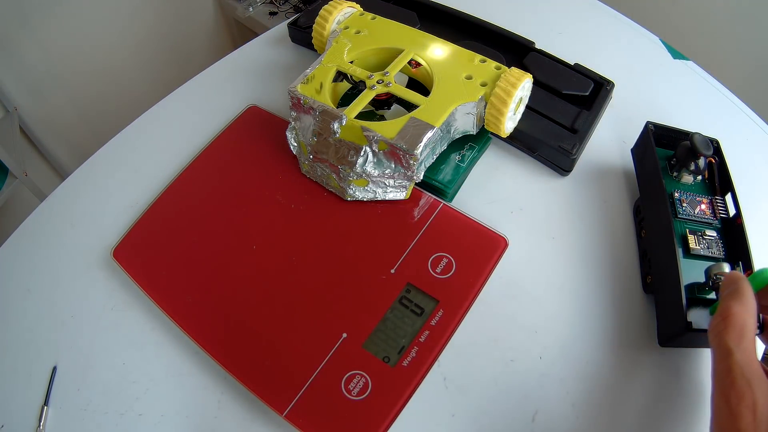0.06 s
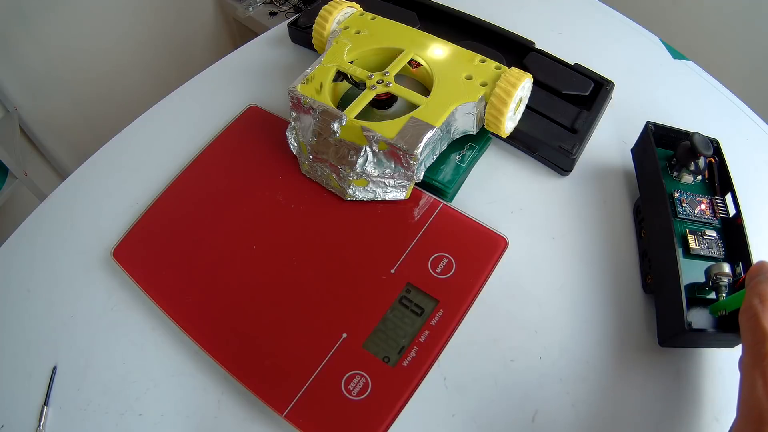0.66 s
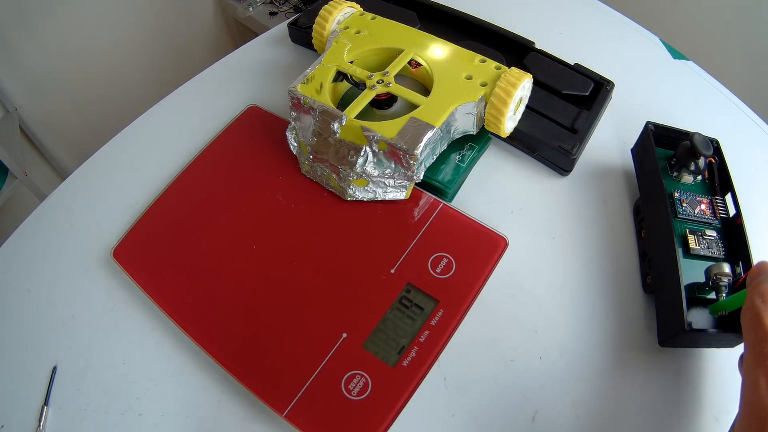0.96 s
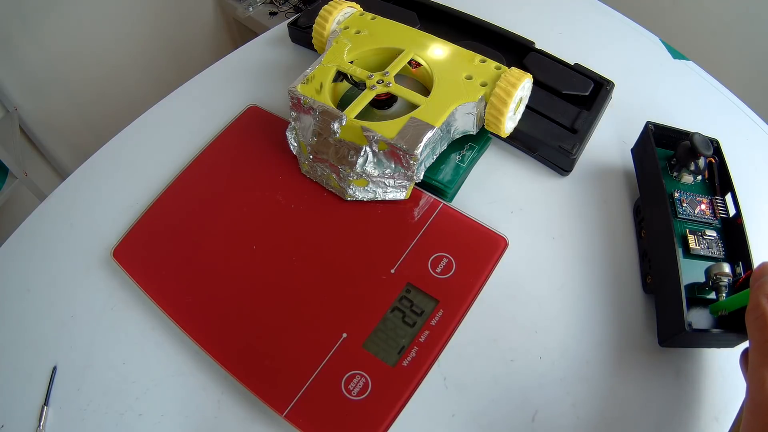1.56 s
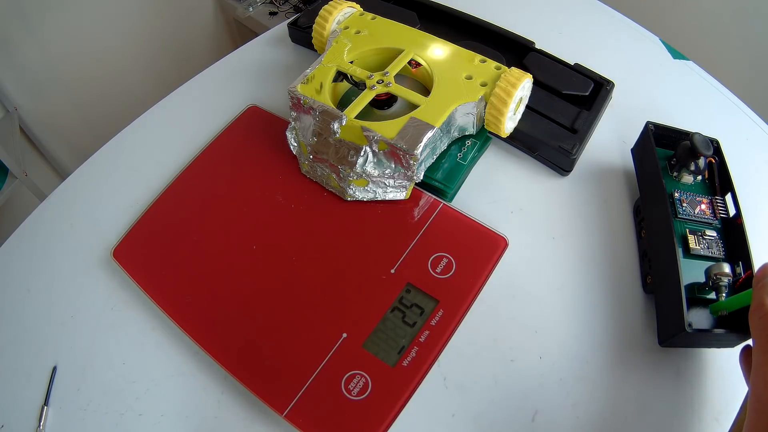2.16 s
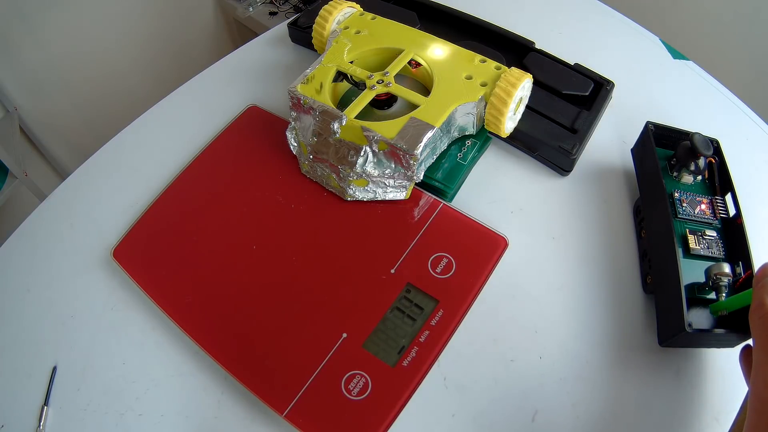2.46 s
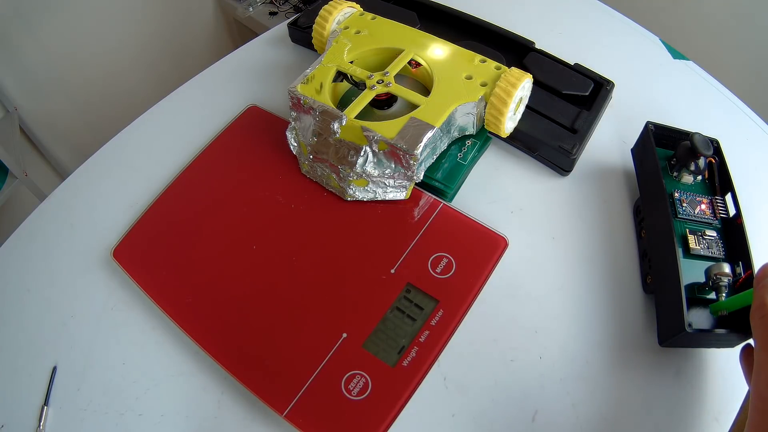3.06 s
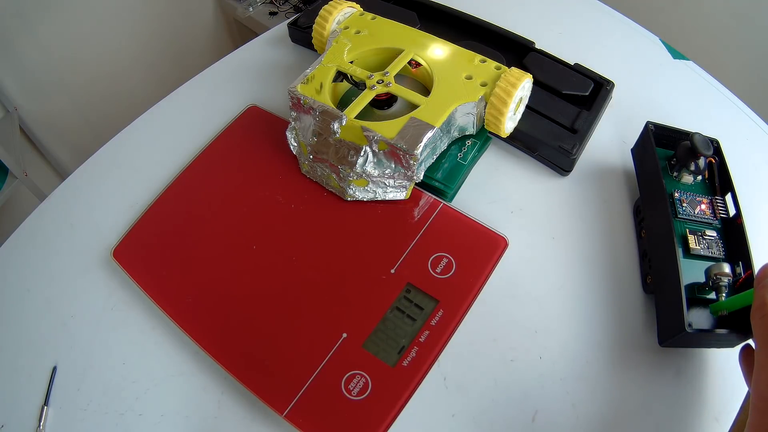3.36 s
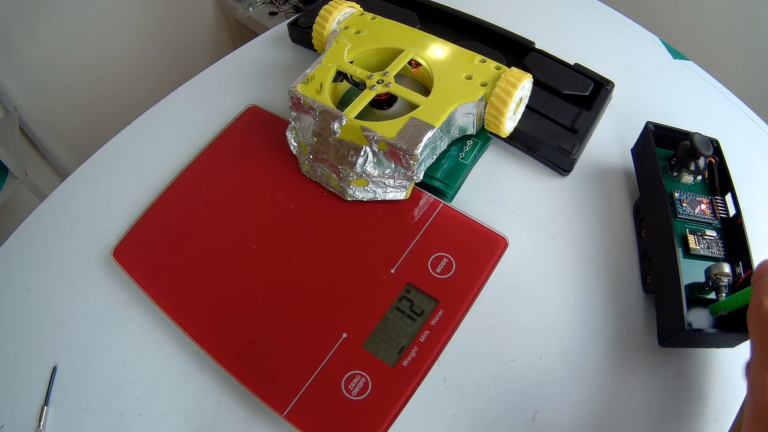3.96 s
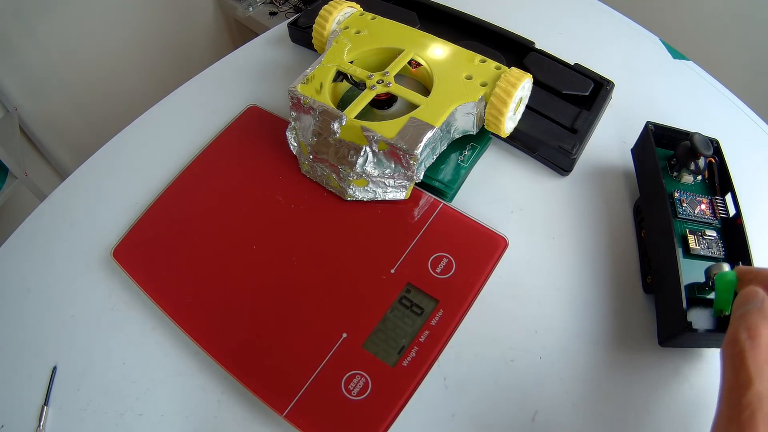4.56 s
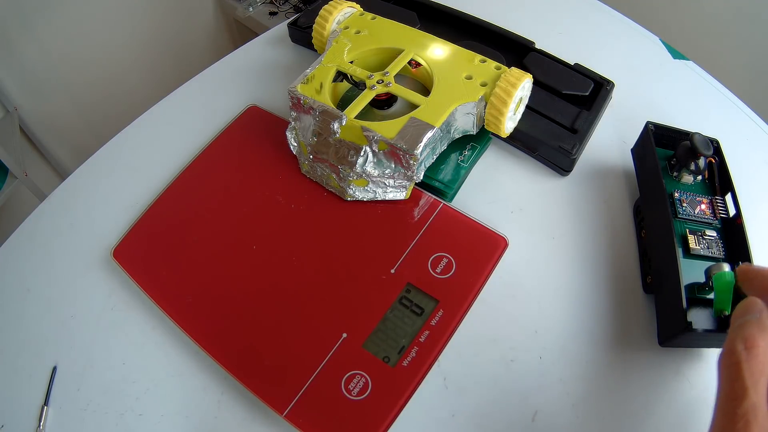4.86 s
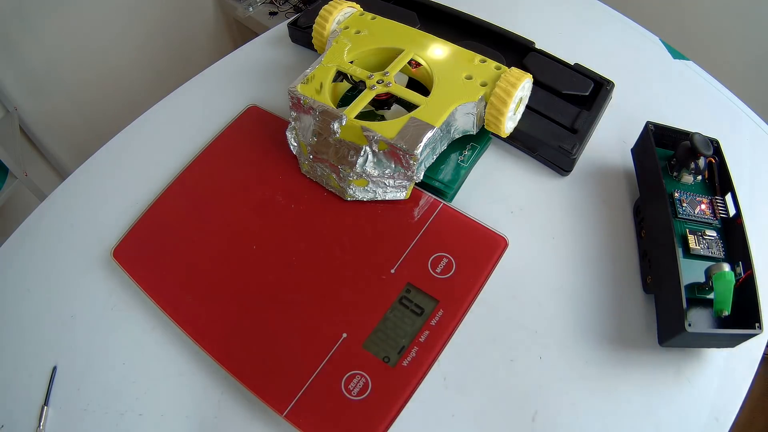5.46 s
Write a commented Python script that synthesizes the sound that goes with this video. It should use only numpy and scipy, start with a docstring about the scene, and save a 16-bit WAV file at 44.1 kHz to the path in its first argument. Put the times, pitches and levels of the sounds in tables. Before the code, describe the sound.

For the first half second there is only the faint, low background noise of a quiet room. At about 0.6 seconds a small electric fan in a plastic robot chassis starts with a brief, rough, high squeal. It spins up quickly, its whine rising over a turbulent rush of air by 1 second. The pitch and loudness keep climbing in small steps, with a slight buzz and thin hiss joining at around 2 seconds. The fan holds nearly steady, then rises a little more to its peak at about 3.6 seconds. From 3.8 seconds the whine falls and the air fades, exposing a dry bearing rasp, a light plastic rattle and a brief thin whistle near 4.5 seconds. The fan stops at about 5 seconds, leaving quiet room noise. The sound is mono, with light room reverberation.

```python
"""A small three-bladed electric fan in a plastic robot chassis, on a table in a quiet room, in mono.
Its drive squeals as it starts. The blades chop the air into a rising whine over a turbulent rush,
while motor tones, all multiples of the shaft speed, sweep through the shell's fixed resonances.
The speed holds, rises a little more, then decays under drag and friction with a dry rasp of bearings."""
import sys
import numpy as np
from scipy import signal
from scipy.fft import rfft, irfft, next_fast_len
from scipy.io import wavfile
from scipy.ndimage import uniform_filter1d, map_coordinates

SR = 44100
rng = np.random.default_rng(int(sys.argv[2]) if len(sys.argv) > 2 else 0)


def transcribe(signal):
    """Save signal, clipped to [-1, 1], as a 16-bit WAV file at the path in sys.argv[1]."""
    frames = np.atleast_2d(signal).T
    limited = np.clip(frames, -1, 1)
    pcm = np.round(limited * 32767).astype(np.int16)
    wavfile.write(sys.argv[1], SR, pcm)


N = 243299
TIME = np.arange(N) / SR
BLADE_COUNT = 3


def gain_of(db):
    """Decibels to amplitude ratio."""
    return 10 ** (np.asarray(db) / 20)


def unit_rms(x):
    """Normalisation to an rms of 1."""
    return x / np.sqrt(np.mean(x ** 2) + 1e-20)


def curve_at(points, hz):
    """Linear interpolation on a log-frequency axis."""
    f, value = np.transpose(points)
    return np.interp(np.log(hz + 1), np.log(f + 1), value)


def noise(spectrum):
    """Spectral shaping of white noise, at an rms of 1."""
    size = next_fast_len(N)
    shape = gain_of(curve_at(spectrum, np.fft.rfftfreq(size, 1 / SR)))
    return unit_rms(irfft(rfft(rng.standard_normal(size)) * shape, size)[:N])


def wander(rate_hz):
    """Smooth random modulation of rms 1: a spline through random knots."""
    knots = rng.standard_normal(4096)
    return unit_rms(map_coordinates(knots, [TIME[::16] * rate_hz], order=3, mode="wrap").repeat(16)[:N])


def resonate(x, hz, width_hz, stages=1):
    """Second-order resonance with a peak gain of 1; cascading steepens its skirts."""
    for _ in range(stages):
        x = signal.lfilter(*signal.iirpeak(hz, hz / width_hz, fs=SR), x)
    return x


def filtered(x, order, hz, kind):
    """Butterworth filtering."""
    return signal.sosfilt(signal.butter(order, hz, kind, fs=SR, output="sos"), x)


def tone(turns, multiple, flutter_db, jitter):
    """A rotational order with random amplitude and phase modulation (jitter in radians)."""
    amplitude = np.sqrt(2) * gain_of(flutter_db * wander(45))
    return amplitude * np.sin(2 * np.pi * multiple * turns + jitter * wander(70))


def power_law(pace, power, knee):
    """A gain rising as a power of the pace (share of top speed), saturating at 1 above the knee."""
    rise = (pace / knee) ** power
    return rise / np.sqrt(1 + rise ** 2)


def run_down(from_s=4.343, over_s=0.24):
    """A linear ramp from 0 to 1 into the closing timbre, by default during the coast."""
    return np.clip((TIME - from_s) / over_s, 0, 1)


def room_tone():
    """Stationary background noise, strongest in the bass."""
    # noise spectrum: (frequency [Hz], relative level [dB])
    spectrum = [(15, -27), (25, -1), (53, -2.5), (110, -2.5), (148, -1), (215, -1.5), (741, -10.5),
                (826, -10), (1410, -18), (4380, -30.5), (10900, -32.5), (14300, -38.5), (15500, -34)]
    return gain_of(-59) * noise(spectrum)


def drive_squeal(onset_s=0.538, peak_s=0.631, swell_db_per_s=150, fade_db_per_s=293):
    """Two close, noise-driven resonances beat in a rough squeal that swells until the rotor picks up."""
    # excitation spectrum: (frequency [Hz], relative level [dB])
    spectrum = [(500, -29), (2200, -35), (3200, -18), (4400, -36.5), (7300, -25), (8300, -12), (9300, -25),
                (15000, -52)]
    pair = resonate(noise(spectrum), 8110, 55) + resonate(noise(spectrum), 8330, 59.9)
    late = TIME - peak_s
    swell = (TIME > onset_s) * gain_of(-35 + np.minimum(swell_db_per_s * late, -fade_db_per_s * late))
    return swell * (gain_of(2.5) * unit_rms(pair) + gain_of(-1.5) * noise(spectrum))


def chassis_pings(hz=770, t60=0.2, attack_s=0.0092):
    """Damped free vibration of one chassis mode as the rotor starts and settles."""
    # excitations of the mode: (time [s], level [dB])
    pings = [(0.575, -48), (4.645, -42), (5.012, -46)]
    ages = [(np.maximum(TIME - s, 0), db) for s, db in pings]
    return sum(gain_of(db - 60 * t / t60) * (1 - np.exp(-t / attack_s)) * np.sin(2 * np.pi * hz * t)
               for t, db in ages)


def shaft_speed(start_s=0.595, stop_s=5.02, drag_per_s=1.15):
    """Turns per second: under power, then slowed along a tangent law by air drag and dry friction."""
    # the fan under power: (time [s], shaft speed [turns/s])
    throttle = [(0.66, 121.7), (0.72, 171.8), (0.82, 209.1), (0.93, 229.6), (1.18, 237.6), (1.33, 255.4),
                (1.53, 269.8), (1.84, 278.5), (2.0, 289.5), (2.25, 293.8), (2.38, 299.7), (2.82, 299.5),
                (2.97, 306.9), (3.2, 309.0), (3.53, 334.6), (3.73, 337.2), (3.9, 314.6), (3.98, 286.1),
                (4.09, 228.8)]
    times, speeds = np.transpose([(start_s, 0)] + list(throttle))
    remaining_s = stop_s - np.clip(TIME, times[-1], stop_s)
    coast = np.tan(drag_per_s * remaining_s) / np.tan(drag_per_s * (stop_s - times[-1]))
    return abs(uniform_filter1d(np.interp(TIME, times, speeds) * coast, size=1500))


def shell(x):
    """Forced vibration: the plastic shell resonates at fixed frequencies, whatever drives it."""
    # shell modes: (frequency [Hz], bandwidth [Hz], gain [dB])
    modes = [(1450, 110, 0), (2850, 200, -14), (3860, 90, -10), (4280, 90, -6), (4550, 85, 2.5),
             (5150, 160, -16), (6360, 250, -19), (8250, 300, -24), (11500, 120, -28)]
    return sum(gain_of(db) * resonate(x, hz, width) for hz, width, db in modes)


def bearing_rasp(turns, pace):
    """Brush and bearing friction throbs once a turn, dulls at low speed and rattles the shell."""
    # friction and knock spectra: (frequency [Hz], relative level [dB])
    rasp_spectrum = [(300, -33), (1200, 0.5), (2600, -15), (3450, -18), (4300, -1.5), (5100, -1),
                     (5700, 1.5), (6600, -2), (7400, -11.5), (8400, -8), (10000, -13.5), (11800, -22.5),
                     (13500, -22), (15500, -32)]
    knock_spectrum = [(500, -12.5), (1400, 0.5), (2300, -7), (3400, -8), (4500, 2.5), (5300, -14),
                      (12000, -11)]
    grain = gain_of(wander(700) + 1.1 * wander(80)) * (1 + 0.13 * np.cos(2 * np.pi * turns))
    scrape = noise(rasp_spectrum) * grain
    dull = filtered(noise(rasp_spectrum) * grain, 3, 6800, "lowpass")
    hiss = pace * scrape + np.sqrt(1 - pace ** 2) * dull
    knocks = noise(knock_spectrum) * grain
    ring = unit_rms(shell(knocks) + gain_of(-8) * resonate(knocks, 1500, 700))
    ring *= gain_of(1.2 * wander(45))
    hiss_gain = gain_of(-18 + 1.5 * run_down()) * power_law(pace, power=2.83, knee=0.94)
    rattle_gain = gain_of(-31 + run_down()) * power_law(pace, power=4, knee=0.37)
    creep_gain = gain_of(-49) * run_down() * power_law(pace, power=1.96, knee=0.11)
    return hiss_gain * hiss + rattle_gain * ring + creep_gain * (ring + gain_of(-16) * scrape)


def motor_whine(turns, pace, can_hz=4470, can_width_hz=380):
    """Resonant amplification: each order flares as it crosses a mode of the motor can or the shell."""
    # motor and bearing tones: (shaft order [1], relative level [dB])
    orders = [(11.6, -2), (12.97, 2.5), (13.38, -2), (15.48, 1.5), (16.03, -5), (17.3, 4), (18.68, -8),
              (19.34, -4), (21.62, 2), (23.65, -7), (25.95, -3), (27.5, -2), (31.4, -4), (36, -7)]
    tones = sum(gain_of(db) * tone(turns, k, flutter_db=2, jitter=0.4) for k, db in orders)
    whine = gain_of(-28 - 2 * run_down()) * power_law(pace, power=5, knee=0.43) * tones
    can = resonate(whine, can_hz, can_width_hz, stages=2)
    leak = filtered(whine, 2, (3400, 6200), "bandpass") * pace ** 2
    return can + gain_of(-11) * shell(whine) + gain_of(-13) * leak


def airflow(pace):
    """The amplitude of flow noise grows as a power of speed."""
    return gain_of(-16) * power_law(pace, power=2.65, knee=1.166)


def at_speed(pace):
    """A soft threshold: goes steeply from 0 to 1 near 86% of top speed."""
    return power_law(pace, power=41, knee=0.862)


def air_rush(turns, pace, flutter_hz=22):
    """Turbulence pulses with the blades, and duct resonance adds a hollow roar."""
    # rush and hiss spectra: (frequency [Hz], relative level [dB])
    rush_spectrum = [(30, -49.5), (80, -40), (120, -16.5), (175, -16), (240, -25.5), (420, -11.5),
                     (540, -14.5), (660, -1.5), (1050, 1), (1350, 2.5), (1600, 5.5), (1950, 3.5),
                     (2800, 5.5), (3350, -7), (5000, -10.5), (15000, -47)]
    high_hiss_spectrum = [(6000, -39), (9500, 1.5), (11900, -12), (12400, 4), (13400, 4.5), (14000, -14),
                          (15400, -9.5)]
    gusts = gain_of(0.53 * wander(60) + wander(500))
    pulses = 1 + 0.11 * np.cos(2 * np.pi * BLADE_COUNT * turns)
    rush = gain_of(4) * noise(rush_spectrum)
    roar = gain_of(2.5) * pace ** 6 * unit_rms(resonate(noise(rush_spectrum), 1600, 220))
    # at speed, a buzz near 1475 Hz and a thin, very high hiss come in
    flutter = 1 + 0.5 * np.cos(2 * np.pi * flutter_hz * TIME + 1.8 * wander(8))
    buzz = unit_rms(flutter * resonate(rng.standard_normal(N), 1475, 95, stages=2))
    buzz *= gain_of(-22 - 12 * run_down(from_s=3.5, over_s=0.5))
    high_hiss = gain_of(-37.5) * noise(high_hiss_spectrum)
    return gusts * pulses * (airflow(pace) * (rush + roar) + at_speed(pace) * (buzz + high_hiss))


def blade_tones(turns, pace):
    """Periodic chopping of the air gives the blade-passing harmonics; unbalance adds shaft orders."""
    # response of duct and table to the fundamental: (frequency [Hz], gain [dB])
    duct = [(420, 2), (530, -2), (633, 2), (730, -4), (777, 1), (830, -3), (878, 6), (898, -0.5),
            (930, 7.5), (970, 1.5), (1008, 5.5)]
    # blade overtones: (harmonic [1], full level [dB], speed exponent [1], change when faded [dB])
    harmonics = [(2, -15.5, 4.73, -18), (3, -23.5, 3.0, -8)]
    # tones of the unbalanced rotor: (shaft order [1], level relative to the airflow [dB])
    orders = [(1, -19.5), (2, -24.5), (4, -21.5), (12, -15)]
    passes = BLADE_COUNT * turns
    passing_hz = np.gradient(passes) * SR
    strength = gain_of(-20 + curve_at(duct, passing_hz)) * power_law(pace, power=4.84, knee=0.86)
    fundamental = strength * tone(passes, 1, flutter_db=1, jitter=0.15)
    # the overtones fade at speed and stay weak through the run-down
    faded = np.maximum(at_speed(pace) ** 4, run_down(from_s=3.6, over_s=0.15))
    overtones = sum(gain_of(db + fade_db * faded) * power_law(pace, power, knee=0.88)
                    * tone(passes, round(k), flutter_db=1.7, jitter=0.3)
                    for k, db, power, fade_db in harmonics)
    unbalance = sum(gain_of(db) * tone(turns, round(k), flutter_db=2.1, jitter=0.31) for k, db in orders)
    return fundamental + overtones + airflow(pace) * pace ** 6 * unbalance


def table_hum(turns, pace):
    """A subharmonic: near top speed the chassis wobbles on the table once in three turns."""
    return gain_of(-47.5) * pace ** 14 * tone(turns / 3, 1, flutter_db=2, jitter=0.5)


def drive_whine():
    """Narrow-band noise: a faint, high whine from the drive during the coast."""
    whine = unit_rms(resonate(rng.standard_normal(N), 14700, 150, stages=2))
    return whine * run_down() * gain_of(-78 - 9 * abs(TIME - 4.5))


def motor_whistle(turns, pace):
    """One high shaft order whistles thinly as the coast passes about a quarter of top speed."""
    peak = np.exp(-((pace - 0.243) / 0.036) ** 2)
    skirt = gain_of(-18) * np.exp(-((pace - 0.26) / 0.09) ** 2)
    return gain_of(-40) * run_down() * (peak + skirt) * tone(turns, 37, flutter_db=2.2, jitter=1.1)


def reverberation(x):
    """Convolution with a diffuse, exponentially decaying tail whose highest treble dies first."""
    # room decay: (frequency [Hz], reverberation time [s])
    t60 = [(200, 0.57), (1500, 0.55), (5000, 0.63), (14000, 0.17)]
    hz, t, spectra = signal.stft(rng.standard_normal(SR // 2), SR, nperseg=256)
    decay = gain_of(-60 * t / curve_at(t60, hz)[:, None]) * (t > 0.005)
    tail = signal.istft(spectra * decay, SR, nperseg=256)[1]
    return signal.fftconvolve(x, tail / np.linalg.norm(tail))[:N]


def scene():
    """Superposition: one shaft speed drives the fan, which is too small to radiate much bass."""
    speed = shaft_speed()
    turns, pace = np.cumsum(speed) / SR, speed / speed.max()
    fan = blade_tones(turns, pace) + air_rush(turns, pace) + bearing_rasp(turns, pace)
    fan += motor_whine(turns, pace) + motor_whistle(turns, pace) + table_hum(turns, pace)
    fan += drive_squeal() + drive_whine() + chassis_pings()
    fan = filtered(fan, 1, 85, "highpass")
    mono = fan + gain_of(-11.5) * reverberation(fan) + room_tone()
    return np.array([mono, mono])


def record(dry):
    """Hard clipping at full scale, then band limiting at 15.7 kHz."""
    lowpass = signal.firwin(511, 15700, window=("kaiser", 9), fs=SR)
    return signal.oaconvolve(np.clip(dry, -1, 1), lowpass[None], "same")


dry = scene()
out = record(dry)
transcribe(out)
```